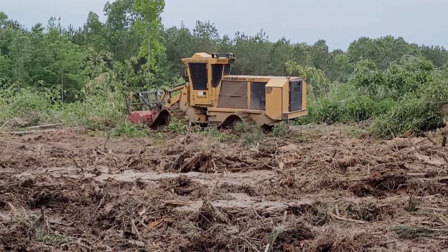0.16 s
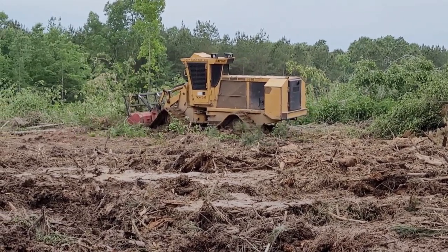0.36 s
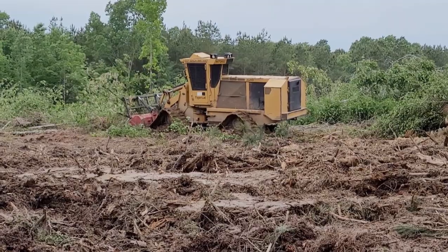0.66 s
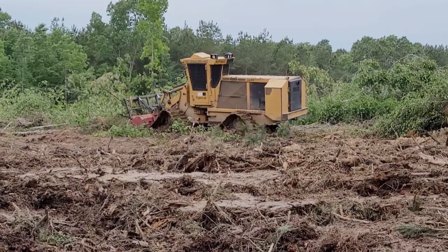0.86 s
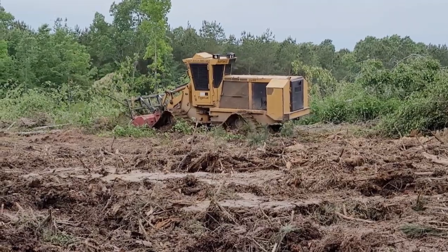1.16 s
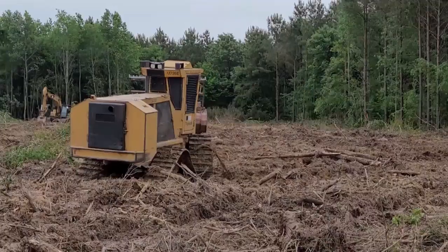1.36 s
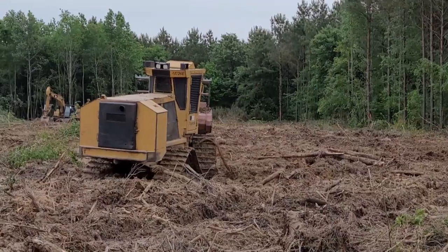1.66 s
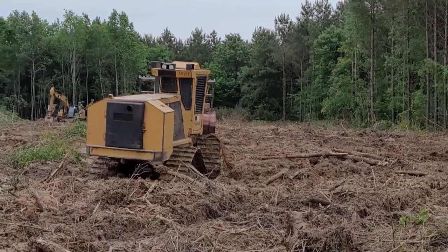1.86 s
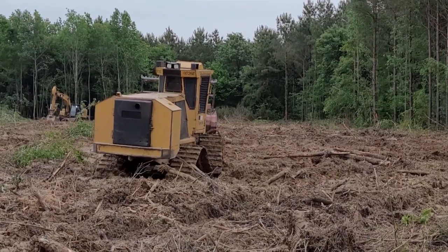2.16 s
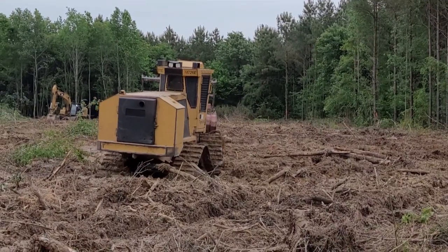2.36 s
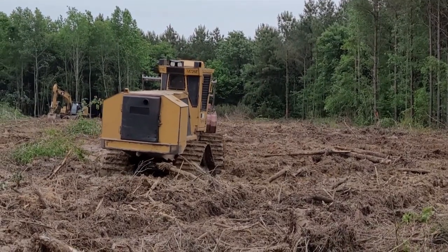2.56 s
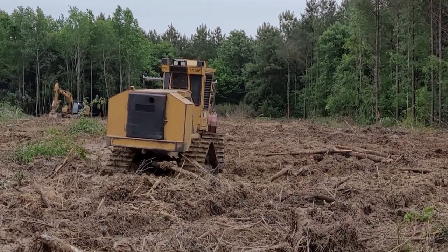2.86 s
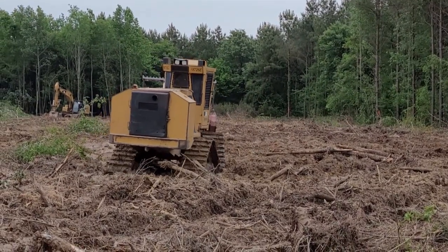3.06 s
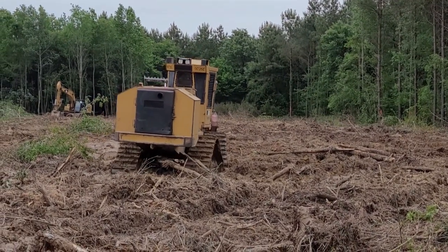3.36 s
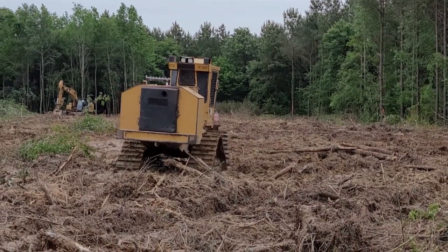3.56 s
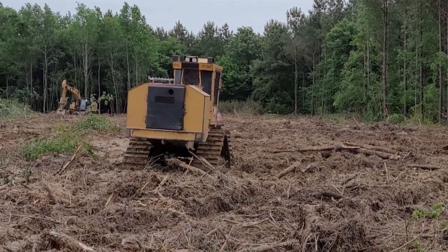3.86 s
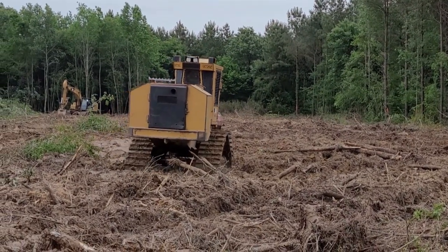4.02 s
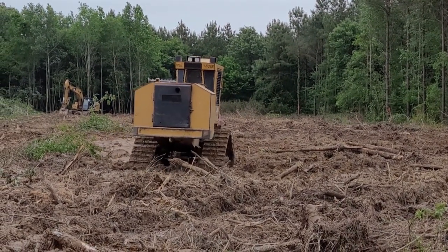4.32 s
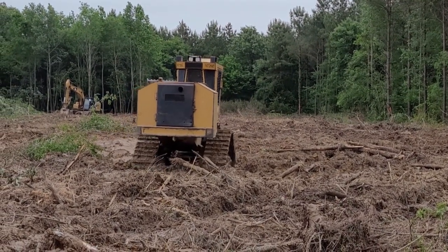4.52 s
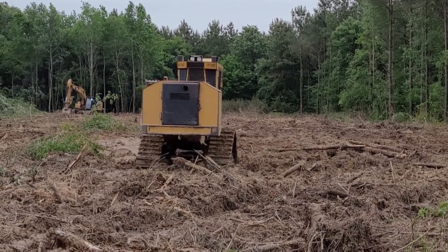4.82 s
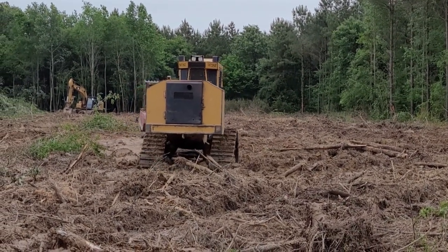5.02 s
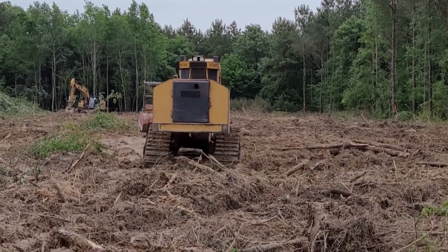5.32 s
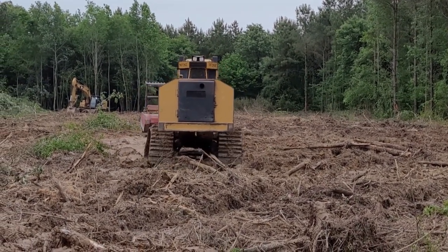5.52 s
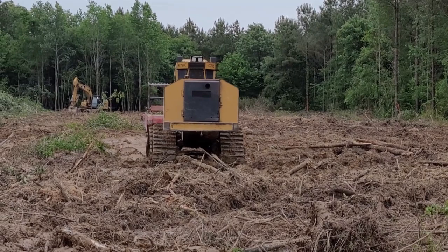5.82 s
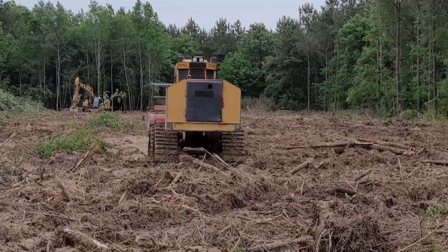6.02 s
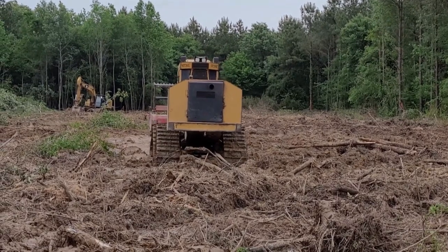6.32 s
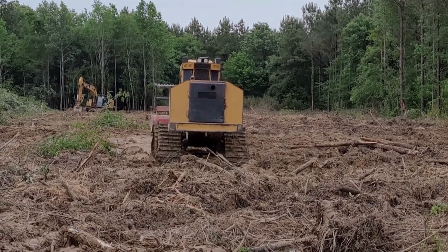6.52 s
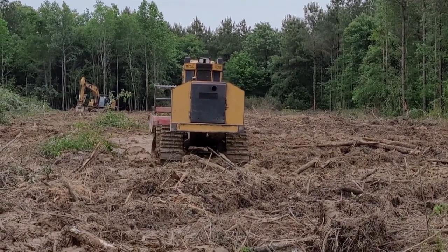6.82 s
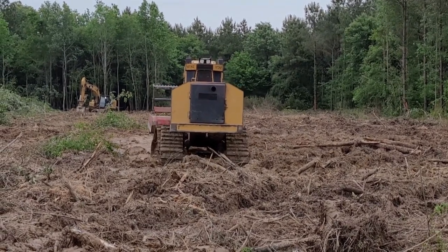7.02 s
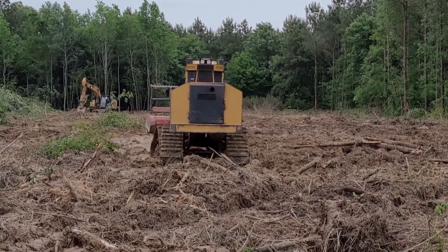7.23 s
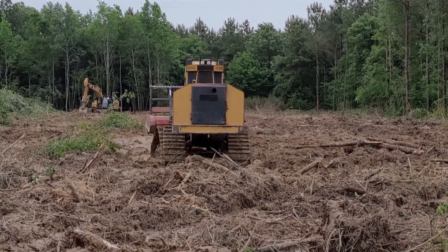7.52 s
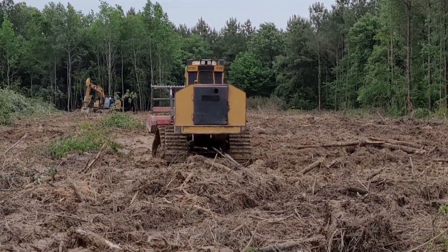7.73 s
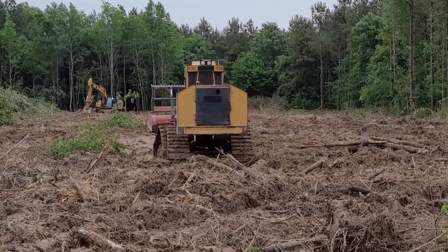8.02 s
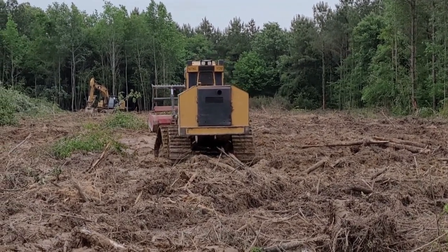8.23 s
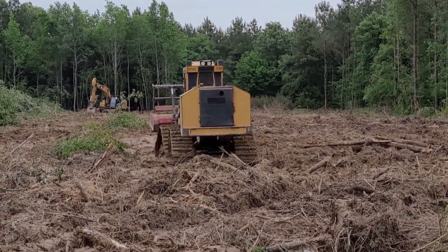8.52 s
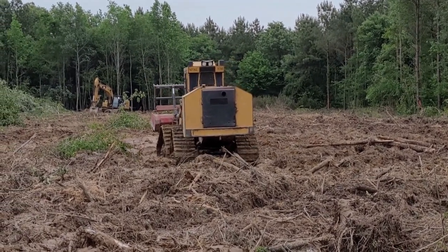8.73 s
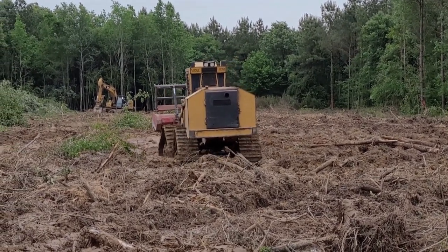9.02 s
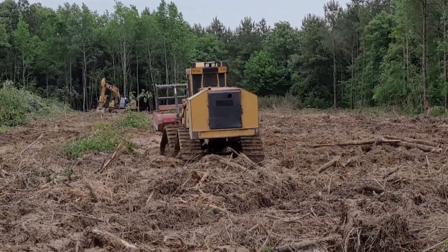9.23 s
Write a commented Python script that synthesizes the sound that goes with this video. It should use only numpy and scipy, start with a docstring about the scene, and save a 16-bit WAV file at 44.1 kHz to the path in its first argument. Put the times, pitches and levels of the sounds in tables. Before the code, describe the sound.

Diesel forestry machine grinds brush in a loud harsh rush, cuts to a blink of silence, then drones deeper-bodied from behind, slowly driving away.

```python
"""Open clearing: a six-cylinder diesel forestry machine heard from two places, split by a short silence:
first from the side while its rotor grinds brush, then from behind as it drives slowly away.
Crank-order tones make the exhaust; coloured noise with a ground echo makes rumble, fan roar, clatter and hiss.
From behind there are also pump whine (sines geared to the crank), turbo whistle (resonant noise) and
one stick crack. Light wind at the ears is low-band noise with gusts and puffs."""
import sys
import numpy as np
from scipy import signal
from scipy.io import wavfile
from scipy.ndimage import uniform_filter1d, minimum_filter1d

SR = 44100
rng = np.random.default_rng(int(sys.argv[2]) if len(sys.argv) > 2 else 0)


def output_pcm(signal):
    """Save a mono or channel-first signal as 16-bit PCM at the path in sys.argv[1].

    Samples are clipped to [-1, 1] before scaling.
    """
    pcm = np.clip(np.atleast_2d(signal).T, -1, 1) * 32767
    wavfile.write(sys.argv[1], SR, np.round(pcm).astype(np.int16))


def undo_db(level):
    """Turn decibels back into plain size, where 20 dB means ten times bigger."""
    steps = np.asarray(level, float) / 20
    return 10 ** steps


N = 413658

# Views: 0 = side-on, 1 = behind.
# firing rate, one table per view: t/s, f/Hz
FIRING_HZ = (
    [(0.1, 76.49), (0.29, 74.6), (0.86, 74.35), (1.04, 75.42)],
    [(1.42, 93.1), (2.32, 93.12), (3.22, 93.58), (3.52, 93.45), (5.02, 94.02), (5.32, 93.8), (5.92, 94.4),
     (6.22, 92.44), (6.52, 92.09), (6.82, 92.25), (7.12, 93.54), (7.5, 93.05), (8.92, 93.96)])
# driving away: t/s, share of the far colour/0-1
FAR_SHARE = [(1.26, 0), (2.5, 0.04), (3.5, 0.31), (5, 0.29), (6.5, 0.59), (9.38, 0.72)]
# driving away: t/s, clatter loss/dB, fan roar loss/dB, hiss loss/dB, octave lift/dB
RETREAT = [(1.26, 1, 3, 1, 0), (1.9, 2, 2.5, 1, 3), (2.5, 3.5, 3.5, 2.5, 0.5), (3.5, 5.5, 4.5, 1, 0),
           (4.3, 6.5, 8, 2, -2), (5.2, 6, 7, 3.5, -2), (5.9, 8.5, 12.5, 6, -3.5), (6.4, 8.5, 14.5, 6, -3.5),
           (6.95, 9, 11.5, 6, 1), (7.2, 9.5, 11, 7, -6), (7.6, 10.5, 12, 6.5, -1.5), (8.5, 8, 15, 5, -0.5),
           (9.38, 9.5, 19.5, 6, -1.5)]


def evened(x):
    """Scales to rms 1."""
    return x / np.sqrt(np.mean(x ** 2) + 1e-20)


def read(points, hz):
    """Reads a spectrum on a log-frequency axis."""
    f, value = np.transpose(points)
    return np.interp(np.log(hz + 1), np.log(f + 1), value)


def follow(rows, t):
    """Every column of a curve at the times t."""
    s, *columns = np.transpose(rows)
    return [np.interp(t, s, column) for column in columns]


def wander(t, top_hz):
    """Random wavering of rms 1: 24 sines of random phase from top_hz / 30 to top_hz."""
    coarse = np.linspace(t[0], t[-1], min(len(t), 3000))
    rates_hz = top_hz * np.geomspace(1 / 30, 1, 24)
    waver = sum(np.sin(2 * np.pi * (f * coarse + rng.random())) / np.sqrt(f) for f in rates_hz)
    return np.interp(t, coarse, evened(waver))


def resonate(x, hz, width_hz):
    """A moving resonance of gain 1: shift down to 0 Hz, one-pole lowpass, shift back."""
    carrier = np.exp(2j * np.pi * np.cumsum(hz) / SR)
    r = np.exp(-np.pi * width_hz / SR)
    return 2 * (carrier * signal.lfilter([1 - r], [1, -r], x / carrier)).real


def swells(steady_db, rows, t):
    """Level in dB: bell-shaped swells (t/s, half length/s, level/dB) add in power to a steady level."""
    power = undo_db(steady_db) ** 2
    for s, half_s, db in rows:
        power = power + undo_db(db) ** 2 * np.exp(-((t - s) / half_s) ** 2)
    return 10 * np.log10(power)


def exhaust(view, crank, firing_db, octave_db, t, lead_rad):
    """Crank orders; each firing is a dip in pressure, and bass phase differs between the ears."""
    # minor tones (three firings a turn): multiple of crank speed, level re firing tone/dB
    side_orders = [(2, -24), (4, -20), (7, -21), (9, -19), (19, -19)]
    behind_orders = [(2, -29.5), (4, -24.5), (5, -22), (7, -28.5), (8, -34.5), (10, -36.5), (11, -30.5),
                     (12, -27.5), (13, -31), (16, -33), (22, -27)]
    turns = 2 * np.pi * crank
    apart = lead_rad * np.array([[0.5], [-0.5]])
    tones = undo_db(firing_db) * np.cos(3 * turns + apart)
    tones = tones + undo_db(octave_db) * np.cos(6 * turns - 0.4 + 0.7 * apart)
    far = follow(FAR_SHARE, t)[0]
    for k, db in (side_orders, behind_orders)[view]:
        drift_rad = 0.34 * np.sqrt(k) * wander(t, 4)  # uneven cylinders blur the minor orders
        level_db = firing_db + db + 2.2 * wander(t, 12) - 3.0 * far * k / 10
        tones += undo_db(level_db) * np.cos(k * turns + drift_rad + 1.5 * apart)
    return -np.sqrt(2) * tones


def machine_noise(view, noises_db, t):
    """Rumble, fan, clatter and hiss as one random field: a direct part combed by the ground echo, and scatter."""
    # noise colours, one table each for side-on, behind near, behind far: f/Hz, level per Hz/dB
    rumble_colours = (
        [(25, -23), (50, -23), (80, 5), (150, -11), (260, -4), (350, -9.5), (450, 2.5), (520, -54)],
        [(25, -43), (50, -2), (80, -2.5), (150, -4), (230, -6.5), (290, -10.5), (450, -13), (520, -49)],
        [(25, -28), (50, -12), (80, 11), (150, -1.5), (230, -12), (290, -18.5), (450, -11.5), (520, -40.5)])
    fan_colours = ([(260, -27), (440, -12.5), (574, -8), (671, -4), (745, 0), (787, -5), (845, -36),
                    (900, -25), (1170, -40), (1980, -120)], [(260, -42), (440, -16), (483, -12), (573, -2),
                    (667, 0), (761, -9), (818, -25), (900, -37), (1170, -28), (1980, -120)], [(260, -35),
                    (440, -20), (460, -23), (505, 7), (595, -6), (663, -0.5), (900, -14), (1170, -50),
                    (1980, -120)])
    clatter_colours = ([(520, -47), (880, -9.5), (1190, -1), (1380, -6.5), (1870, -1), (2330, -7),
                        (2590, -10), (3260, -9), (4040, -13.5), (6800, -23), (8840, -60), (15000, -120)],
                        [(520, -55), (880, -2), (1150, 1.5), (1360, -7.5), (1560, -9), (1690, -7),
                        (2090, -8.5), (2270, -4.5), (2560, -15), (3340, -5), (3700, -12.5), (4000, -11.5),
                        (4870, -17.5), (5680, -15.5), (6800, -27.5), (8840, -62), (15000, -120)],
                        [(520, -36), (880, -12.5), (1130, 2), (1370, -6), (1550, 1), (1600, -5),
                        (1690, 0.5), (1900, -3), (2310, -6.5), (2540, -9.5), (3150, -8.5), (3770, -14.5),
                        (6800, -23), (8840, -52), (15000, -120)])
    hiss_colours = ([(3820, -45), (6500, -8), (8130, 0.5), (9200, 0), (11000, -1.5), (12400, -5),
                     (15600, -20)], [(3820, -10), (6500, -8.5), (7050, -1), (8810, 2.5), (9650, -3),
                     (12200, -2.5), (14200, -7), (15600, -14)], [(3820, -3), (6500, -2), (8680, 5),
                     (10000, -5), (12100, -12), (15600, -46)])
    # rumble per view: level/dB
    rumble_db = -27.5, -24
    # ground echo, one row per view: left delay/ms, right delay/ms, strength/0-1, phase turn/rad, fades above/Hz
    ground_echo = (1.96, 1.92, 0.23, 2.5, 5000), (1.96, 1.9, 0.19, 2.85, 3910)
    # bodywork resonances, one table per view: f/Hz, width/Hz, lift/dB
    body_panels = (
        [(720, 47, -1), (1190, 60, 1), (1440, 36, 5), (1523, 46, 7.5), (2386, 63, 9.5), (2747, 55, 7),
         (3210, 67, 6), (3670, 50, 7), (7800, 73, -6), (8360, 90, 2)],
        [(714, 23, 1.5), (1028, 26, 3), (2300, 30, 5.5), (3260, 74, 3.5), (4600, 110, 1), (5840, 200, 3.5)])
    # share straight from the machine, rest scattered, one table per view: f/Hz, share/0-1
    direct_share = (
        [(60, 1), (300, 1), (900, 0.9), (2200, 0.67), (3500, 0.37), (4300, 0.46), (5500, 0.6), (7000, 0.37),
         (11000, 0.45), (15000, 0.3)],
        [(60, 0.86), (300, 1), (900, 0.94), (1550, 0.68), (2200, 0.91), (3600, 0.69), (5000, 0.46),
         (6500, 0.3), (9000, 0.6), (10500, 0.17), (15000, 0)])
    # ear phase, one table per view: f/Hz, lead of left/rad
    ear_lead = (
        [(300, -0.5), (3700, 0.82), (6460, -3), (7840, -2), (13600, -6.5), (15300, -15)],
        [(300, -0.22), (2840, 0.31), (3620, 0.4), (4390, -0.79), (5940, 0.31), (8100, 1.2), (9040, 0.82),
         (15300, 0.2)])
    # ear level, one table per view: f/Hz, left minus right/dB
    ear_lean = (
        [(300, -1.5), (640, 1), (1410, 0), (3100, 0.5), (6820, 1), (10000, -3.5), (15000, -2)],
        [(300, 0.5), (640, -0.5), (1410, 1), (3100, 2.5), (5500, 0), (7800, -5.5), (9200, -0.5), (11500, -1),
         (15000, 5)])

    frame, hop = 2048, 512  # samples
    frames, hz = len(t) // hop + 6, np.fft.rfftfreq(frame, 1 / SR)
    times = t[0] + np.arange(frames) * hop / SR
    levels_db = [rumble_db[view] + 0 * times, *(np.interp(times, t, db) for db in noises_db)]
    far = np.clip(follow(FAR_SHARE, times)[0], 0, 1)

    left_ms, right_ms, strength, turn_rad, fade_hz = ground_echo[view]
    bounce = np.clip(strength, 0, 0.9) / (1 + (hz / fade_hz) ** 2)
    lift_db = sum(db / (1 + (2 * (hz - f) / width) ** 2) for f, width, db in body_panels[view])
    comb = [undo_db(lift_db) * abs(1 + bounce * np.exp(1j * (2 * np.pi * hz * ms / 1000 - turn_rad)))
            for ms in (left_ms, right_ms)]

    power = np.zeros((len(hz), frames))
    for colours, level_db in zip((rumble_colours, fan_colours, clatter_colours, hiss_colours), levels_db):
        near_db = np.outer(read(colours[view], hz), 1 - far)
        far_db = np.outer(read(colours[2 * view], hz), far)  # side-on: same colour
        shape = undo_db(near_db + far_db) ** 2
        power += shape / np.mean(shape * comb[0][:, None] ** 2, axis=0) * undo_db(level_db) ** 2

    draws = rng.standard_normal((frames, len(hz), 8)).T
    direct, *scatter = draws[0:3] + 1j * draws[3:6]
    patches = evened(uniform_filter1d(uniform_filter1d(draws[6], size=20, axis=0), size=6, axis=1))
    # many small modes give a fine ripple that shifts as the machine moves
    ripple = evened(uniform_filter1d(uniform_filter1d(draws[7], size=3, axis=0), size=80, axis=1))

    share = np.clip(read(direct_share[view], hz), 0, 1)[:, None]
    lead = np.exp(0.5j * read(ear_lead[view], hz))
    lean = undo_db(read(ear_lean[view], hz) / 2)[:, None]
    blurred = np.exp(uniform_filter1d(np.log(power + 1e-30), size=7, axis=0))  # scatter fills the notches
    field = np.sqrt(share * power) * direct * np.array([comb[0] * lead, comb[1] / lead])[:, :, None]
    field = field + np.sqrt((1 - share) * blurred) * np.array(scatter)
    field = field * np.array([lean, 1 / lean])
    disturbed = (hz / (hz + 450))[:, None]  # long waves pass the air undisturbed
    field *= undo_db(disturbed * (0.72 * patches + 2.5 * ripple + 0.45 * wander(times, 20)))  # dB

    scale = np.sqrt(np.mean(signal.istft(direct, nperseg=frame, noverlap=frame - hop)[1] ** 2))
    return signal.istft(field, nperseg=frame, noverlap=frame - hop)[1][:, :len(t)] / scale


def side_levels(t):
    """The five levels side-on: the octave thins, the hiss surges as the rotor bites, the rest hold steady."""
    # steady: exhaust/dB, its octave/dB, fan roar/dB, clatter/dB, hiss/dB
    side_db = -17.5, -25.5, -20.5, -15, -29
    # rotor bites brush, hiss surges: t/s, half length/s, level/dB
    bites = [(0.115, 0.08, -28), (0.6, 0.14, -26), (1.174, 0.044, -30)]
    firing, octave, fan, clatter, hiss = side_db
    octave_fade_db_per_s = 4
    return [firing, octave - octave_fade_db_per_s * t, fan, clatter, swells(hiss, bites, t)]


def behind_levels(t):
    """The five levels from behind: the firing tone carries, the noises sink with distance."""
    # before retreat: exhaust/dB, its octave/dB, fan roar/dB, clatter/dB, hiss/dB
    behind_db = -9.5, -21, -15.5, -21, -37
    firing, octave, fan, clatter, hiss = behind_db
    clatter_loss, fan_loss, hiss_loss, lift = follow(RETREAT, t)
    firing_hz = follow(FIRING_HZ[1], t)[0]
    sag_db_per_hz = 0.3  # the firing tone weakens when the engine speed sags
    return [firing + sag_db_per_hz * (firing_hz - firing_hz.mean()), octave + lift, fan - fan_loss,
            clatter - clatter_loss, hiss - hiss_loss]


def machine(view, levels, t, throb, sizzle_throb, throb_turn, start_turn, lead_rad):
    """One view: exhaust plus noise that throbs with each firing, the top treble more; turns in firing cycles."""
    # random wavering: exhaust/dB, its octave/dB, fan roar/dB, clatter/dB, hiss/dB
    flutter_db = 0.46, 1.27, 1.4, 0.5, 1.1
    flutter_hz, sizzle_hz = 30, 9200
    crank = (np.cumsum(follow(FIRING_HZ[view], t)[0]) / SR + start_turn) / 3
    levels_db = [db + depth * wander(t, flutter_hz) for db, depth in zip(levels(t), flutter_db)]
    noise = machine_noise(view, levels_db[2:], t)
    highpass = signal.firwin(255, sizzle_hz, pass_zero=False, fs=SR)
    sizzle = signal.oaconvolve(noise, highpass[None], "same")
    beat = np.cos(2 * np.pi * (3 * crank - throb_turn))
    throbbing = noise + beat * (throb * noise + sizzle_throb * sizzle)
    return exhaust(view, crank, *levels_db[:2], t, lead_rad) + throbbing


def wind(t):
    """Lumpy low buffeting, unrelated at the two ears, with short brighter puffs."""
    # gusts: t/s, half length/s, level/dB
    gusts = [(1.404, 0.51, -34), (2.88, 0.29, -27), (7.6, 0.4, -33), (8.38, 0.13, -30), (8.82, 0.08, -32)]
    # wind slapping the ears: t/s, level/dB
    puff_rows = [(2.655, -30), (2.826, -24), (3.052, -24), (7.33, -30), (7.65, -29), (8.245, -23),
                 (8.435, -23), (8.53, -28)]
    low_band = signal.butter(2, (35, 130), "band", fs=SR, output="sos")
    wide_band = signal.butter(2, (50, 330), "band", fs=SR, output="sos")
    buffeting = evened(signal.sosfilt(low_band, rng.standard_normal((2, N))))
    slaps = evened(signal.sosfilt(wide_band, rng.standard_normal((2, N))))
    lumps = undo_db(swells(-55, gusts, t) + 2.8 * np.array([wander(t, 21), wander(t, 28)]))
    puffs = sum(undo_db(db) * np.exp(-((t - s) / 0.011) ** 2) for s, db in puff_rows)
    return lumps * buffeting + puffs * slaps


def whine(t):
    """Pump whine: two thin gear tones geared to the crank, level and phase wavering."""
    # pump whine swells: t/s, half length/s, level/dB
    surges = [(2.05, 0.24, -41), (3.05, 0.28, -37), (4.3, 0.48, -40.5), (5.55, 0.22, -41.5),
              (7.706, 0.3, -41.5), (9.38, 0.15, -50)]
    pump_order, second_order = 53, 66.8  # multiples of crank speed; 53 gear teeth
    turns = 2 * np.pi * np.cumsum(follow(FIRING_HZ[1], t)[0]) / SR / 3
    pump_db = swells(-45.5, surges, t) + 2.0 * wander(t, 20)
    second_db = -48.5 + 1.9 * wander(t, 7.4)
    pump = undo_db(pump_db) * np.sin(pump_order * turns + 1.0 * wander(t, 15))
    second = undo_db(second_db) * np.sin(second_order * turns + 1.2 * wander(t, 15))
    return np.sqrt(2) * (pump + second)


def whistle(t):
    """Turbo whistle: a fuzzy narrow band of air noise, partly alike at the ears."""
    # turbo pitch: t/s, f/Hz
    whistle_hz = [(1.26, 11950), (4.2, 11910), (6.3, 11810), (7.15, 12000), (7.5, 11930)]
    hz = follow(whistle_hz, t)[0]
    left, other = [resonate(resonate(rng.standard_normal(len(t)), hz, 90), hz, 90) for _ in range(2)]
    air = evened(np.array([left, 0.5 * left + other]))
    loss_db = 1.8 * follow(RETREAT, t)[0]  # 1.8 dB for each dB the clatter loses
    return undo_db(-43 - loss_db + 1.8 * wander(t, 6.8)) * air


def snaps():
    """Sticks under the tracks: bright twice-differenced noise decaying at 60 dB per 37 ms."""
    # sticks: t/s, nominal peak level/dB
    sticks = [(7.9542, -22)]
    out, t = np.zeros(N), np.arange(900) / SR
    for s, peak_db in sticks:
        crack = np.diff(rng.standard_normal(len(t) + 2), 2) * undo_db(peak_db - 16 - 60 * t / 0.037)
        out[round(s * SR):][:len(t)] += crack
    return out


def scene():
    """Side view, silence, rear view; wind in both."""
    # silence: start/s, end/s
    silence_s = (1.1785, 1.2562)
    stop_s, resume_s = silence_s
    t, out = np.arange(N) / SR, np.zeros((2, N))
    first, second = t < stop_s, t >= resume_s
    out[:, first] = machine(0, side_levels, t[first], throb=0.12, sizzle_throb=0.2, throb_turn=0.46,
                            start_turn=0.01, lead_rad=0.098)
    out[:, second] = machine(1, behind_levels, t[second], throb=0.05, sizzle_throb=0.02, throb_turn=0.12,
                             start_turn=-0.16, lead_rad=0.2)
    out[:, second] += whine(t[second]) + whistle(t[second])
    edge = np.clip(np.maximum(stop_s - t, t - resume_s) / 0.0006, 0, 1)  # 0.6 ms ramps
    return (out + wind(t)) * edge + snaps()


def top_cut(x):
    """Nothing passes above the cut-off."""
    return signal.sosfilt(signal.butter(12, 15740, fs=SR, output="sos"), x)


def record(dry):
    """A fast limiter holds the peaks under full scale."""
    room = np.minimum(1, 0.93 / (abs(dry).max(0) + 1e-9))
    gain = uniform_filter1d(minimum_filter1d(room, size=129), size=129)
    return top_cut(dry * gain)


dry = scene()
out = record(dry)
output_pcm(out)
```